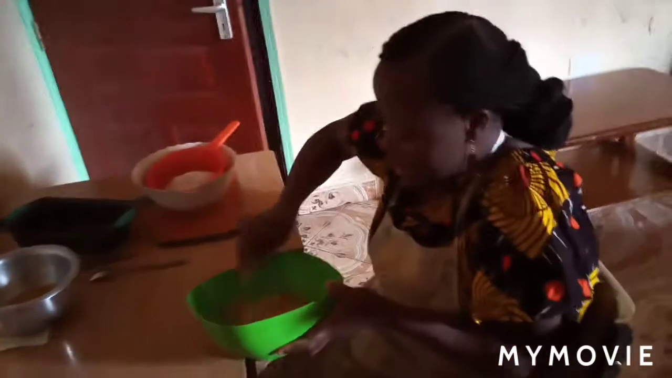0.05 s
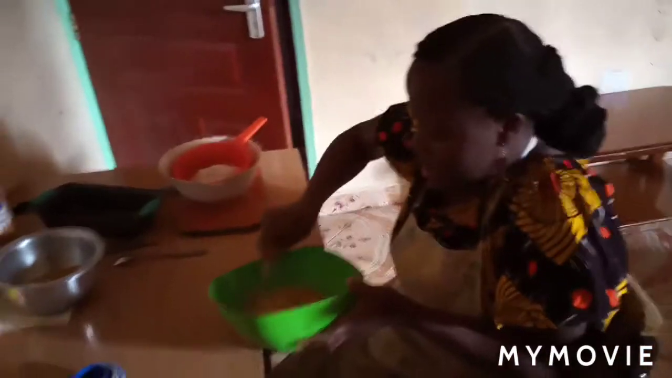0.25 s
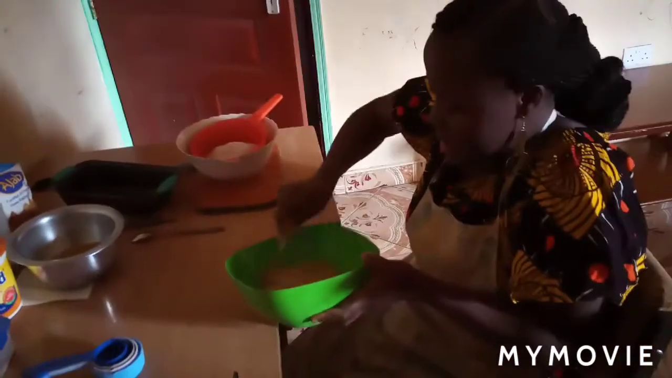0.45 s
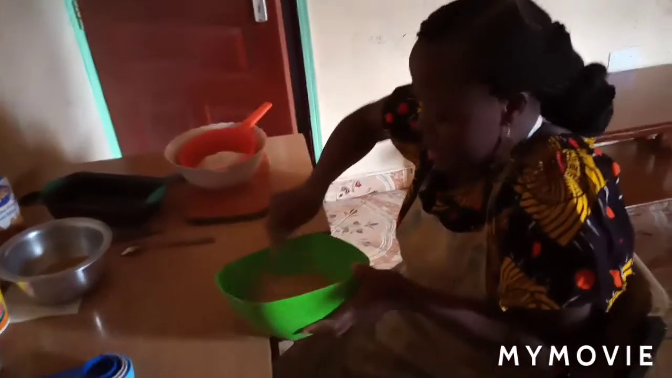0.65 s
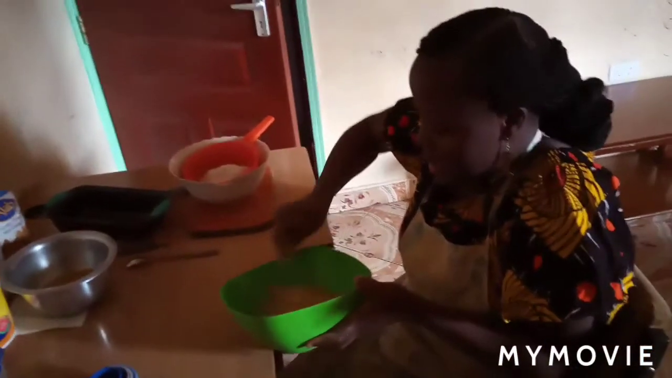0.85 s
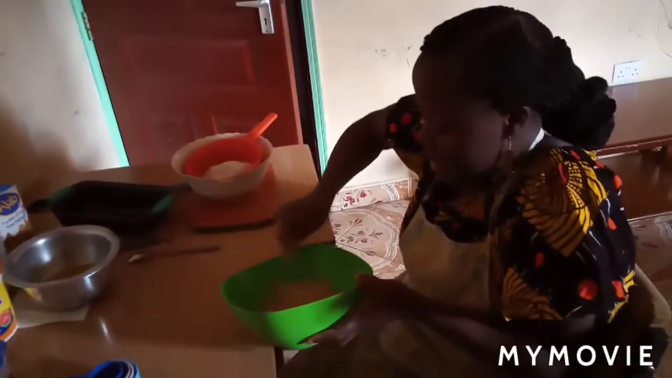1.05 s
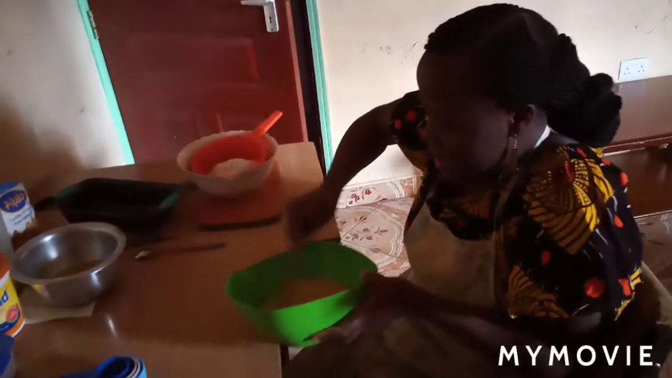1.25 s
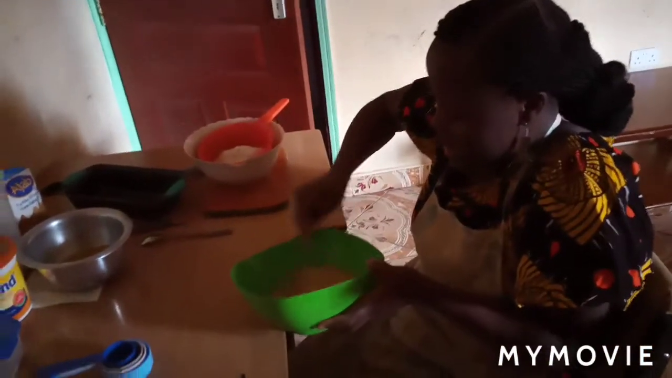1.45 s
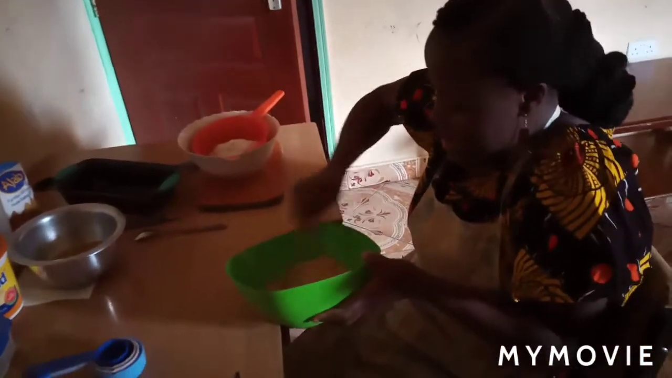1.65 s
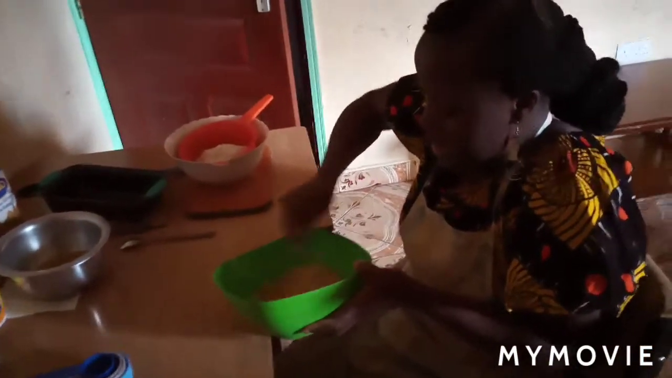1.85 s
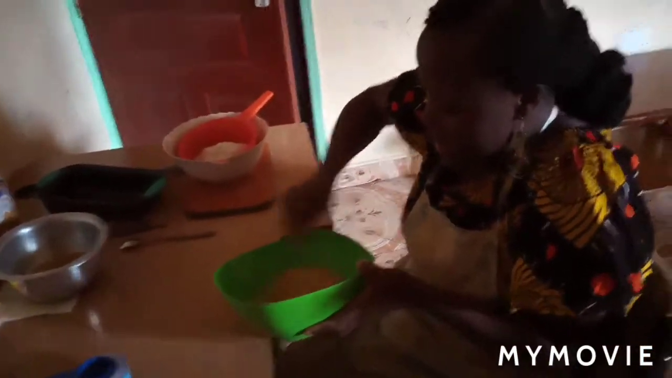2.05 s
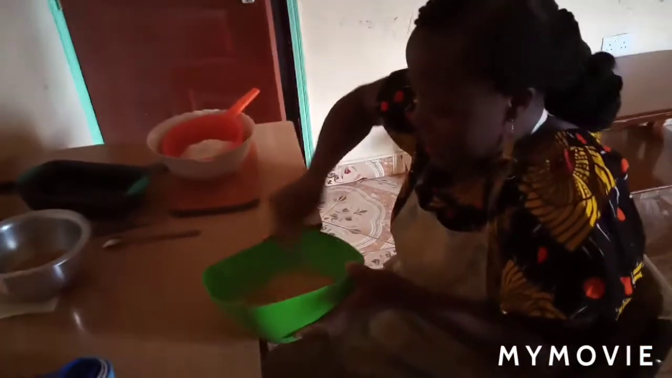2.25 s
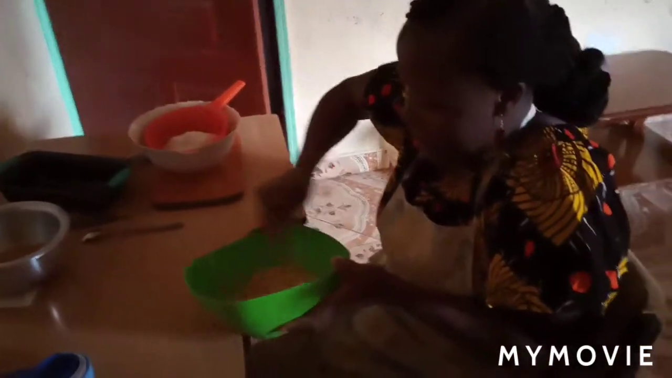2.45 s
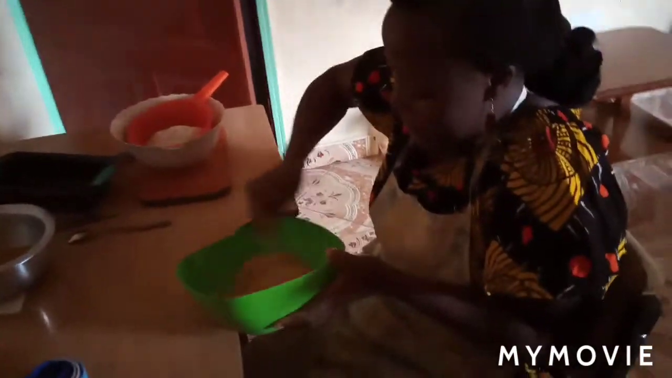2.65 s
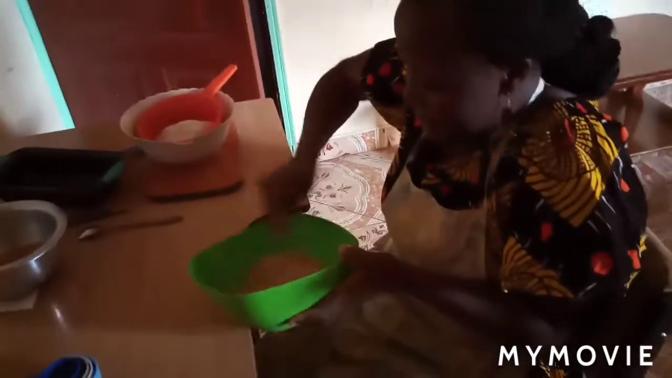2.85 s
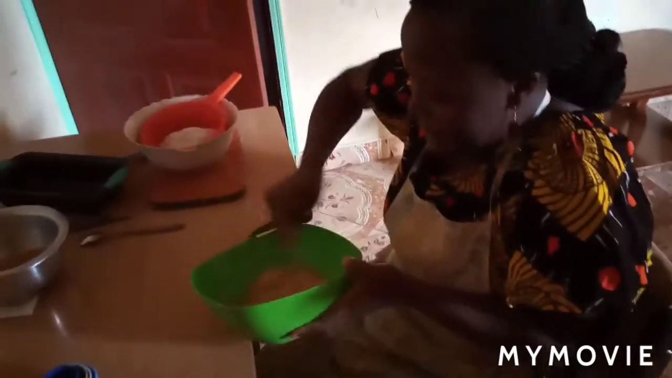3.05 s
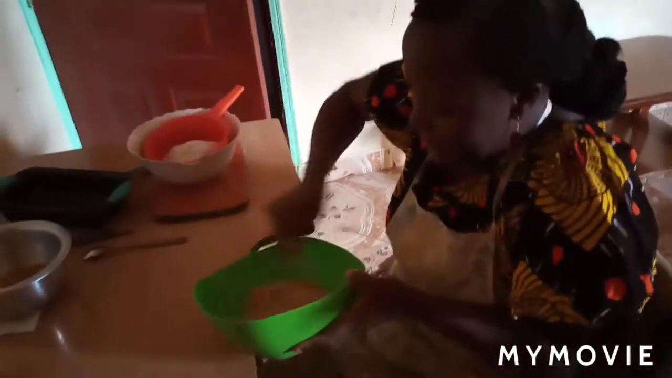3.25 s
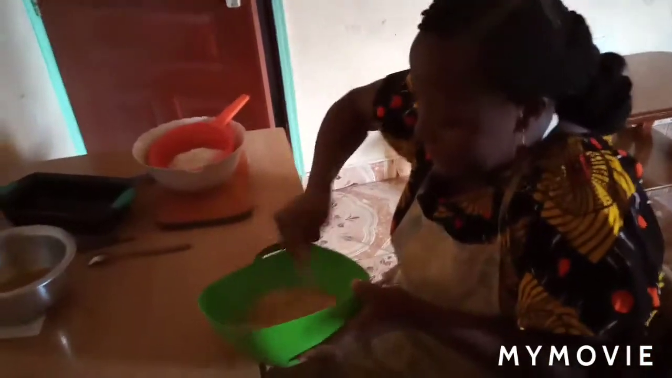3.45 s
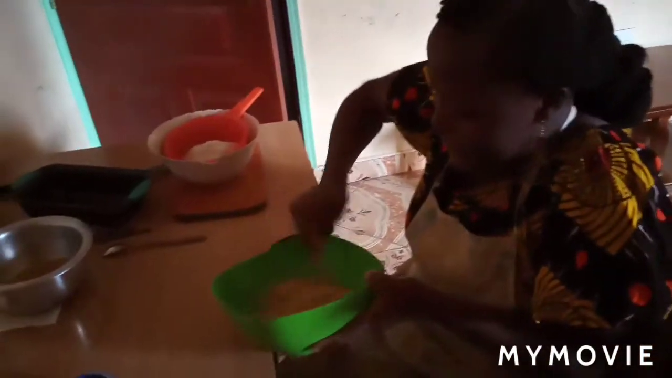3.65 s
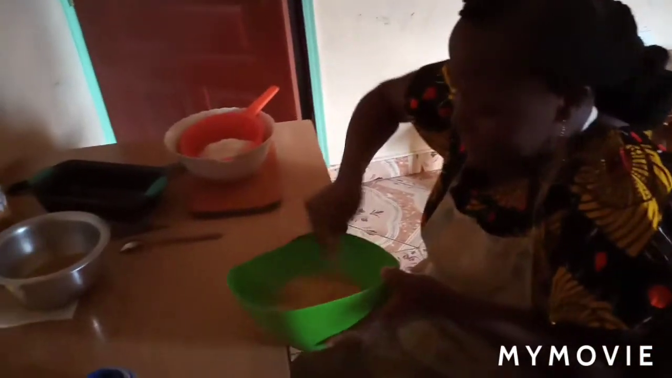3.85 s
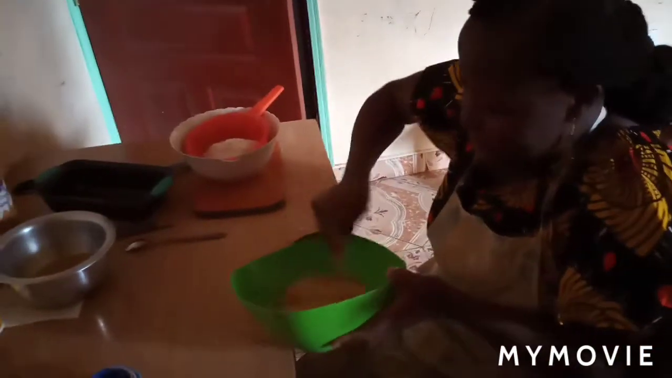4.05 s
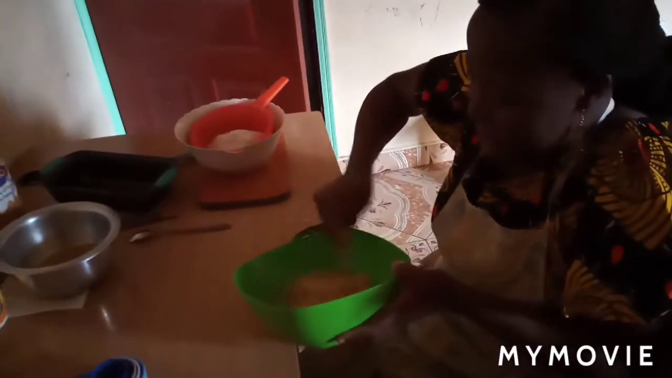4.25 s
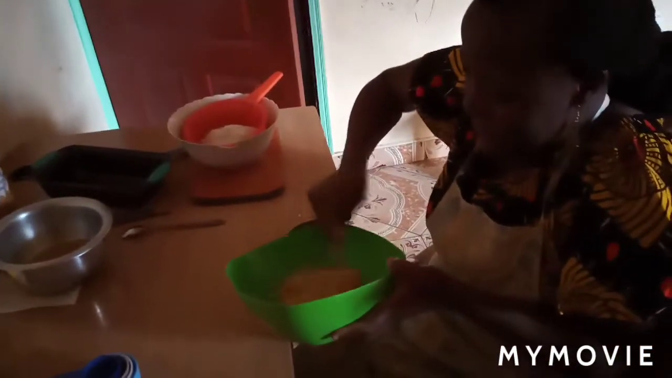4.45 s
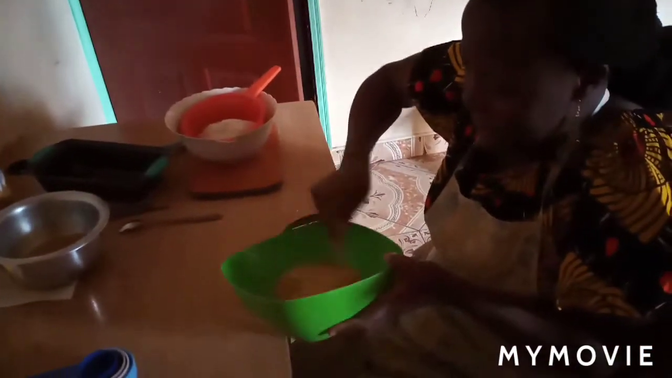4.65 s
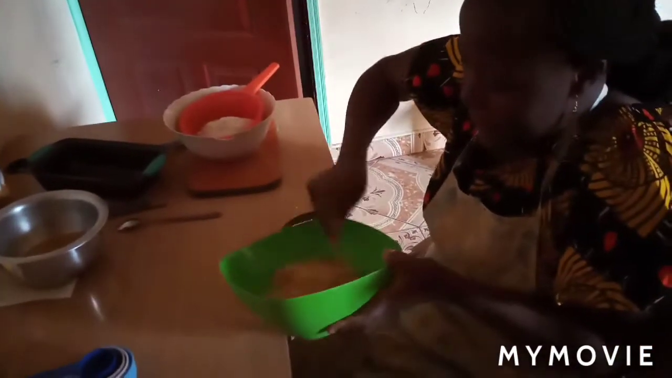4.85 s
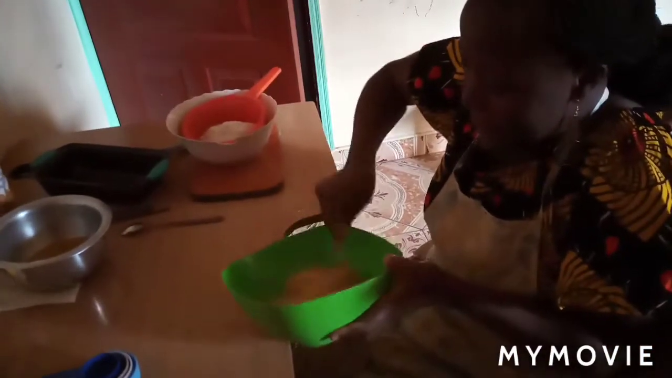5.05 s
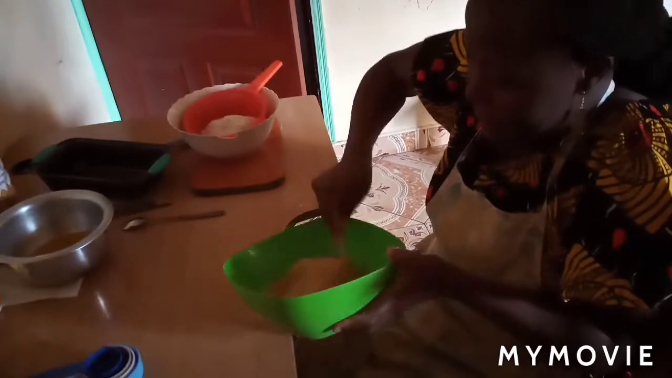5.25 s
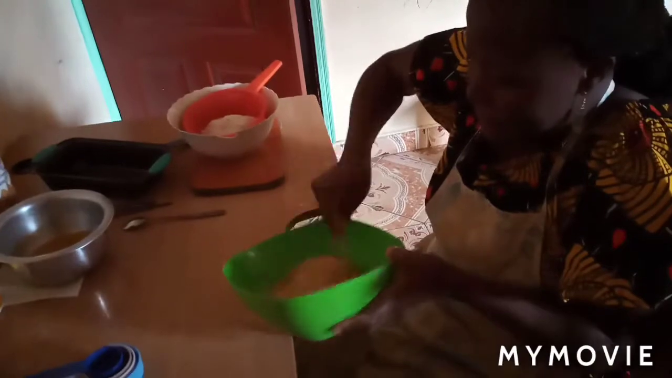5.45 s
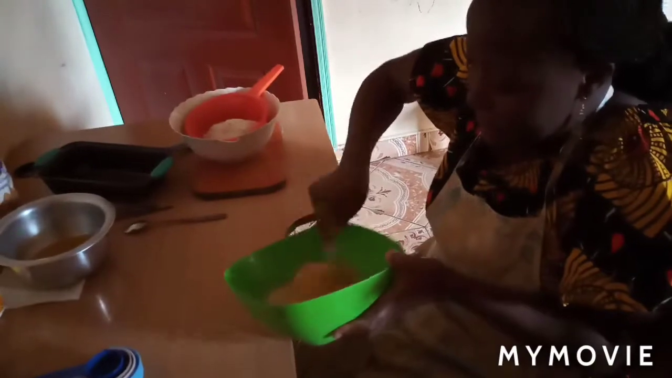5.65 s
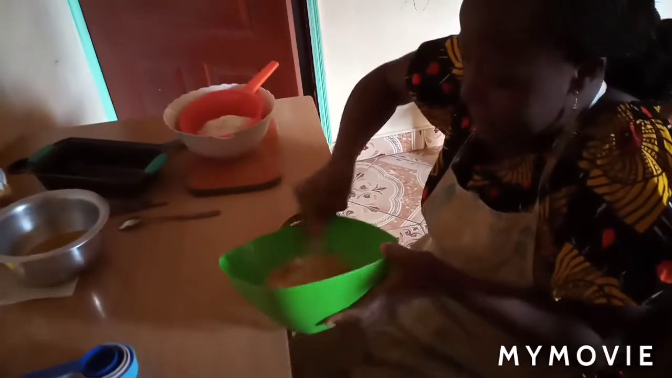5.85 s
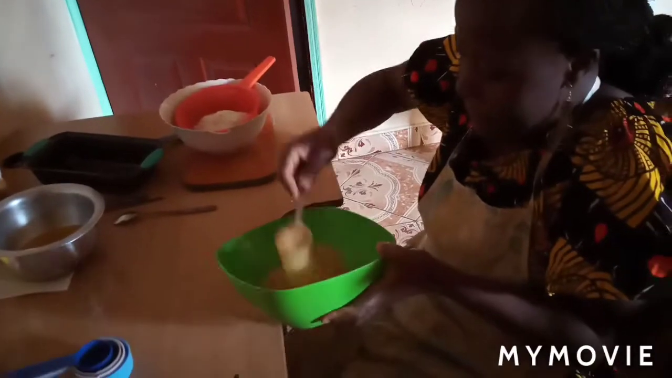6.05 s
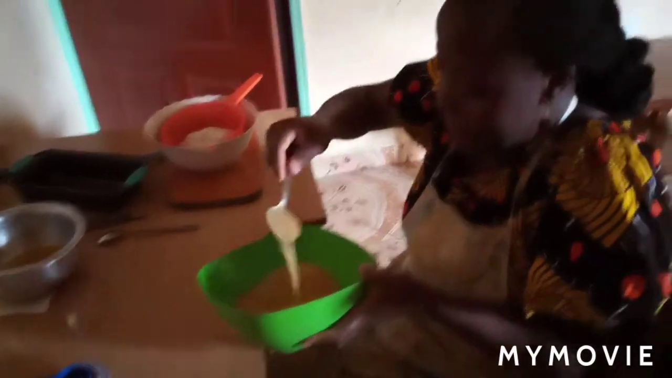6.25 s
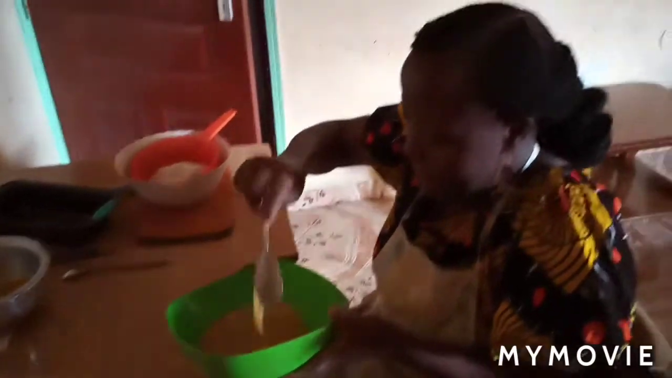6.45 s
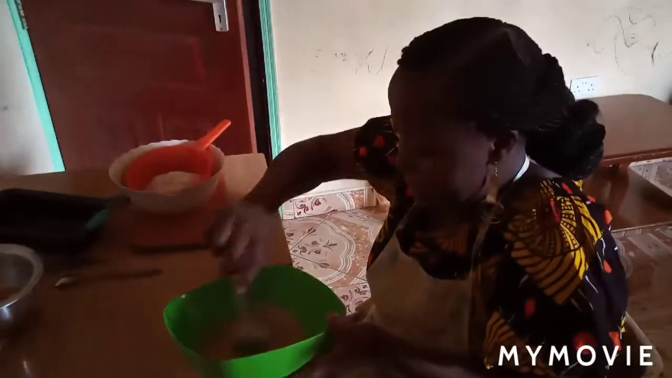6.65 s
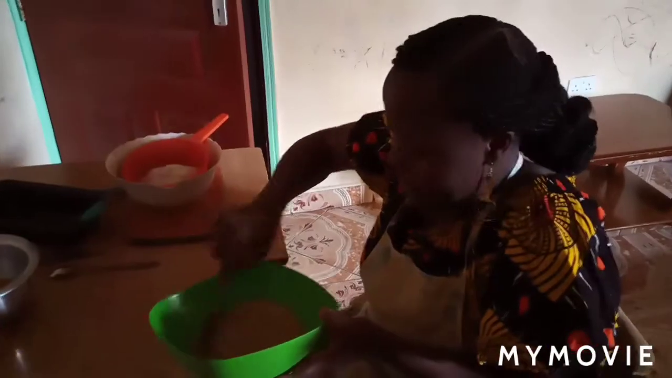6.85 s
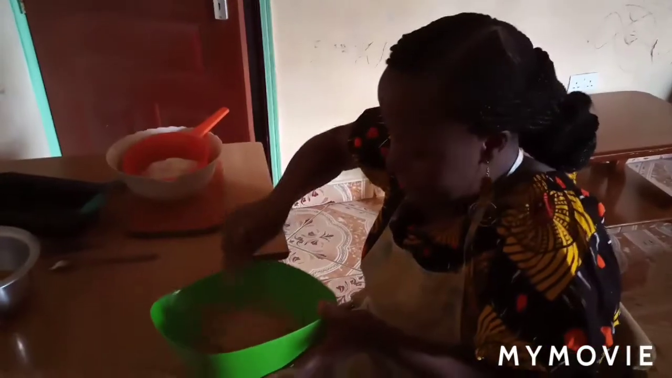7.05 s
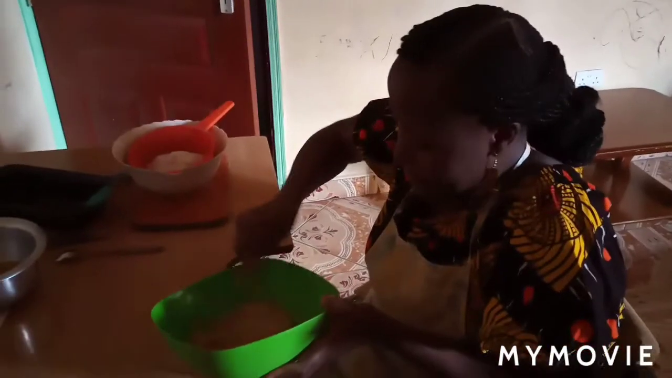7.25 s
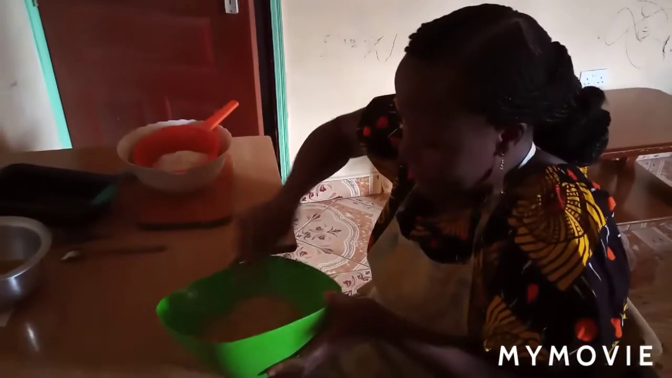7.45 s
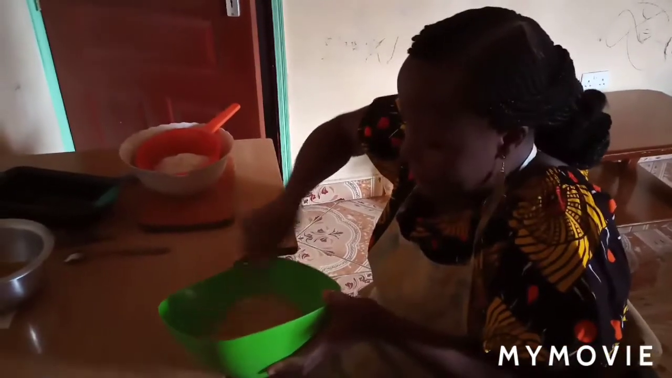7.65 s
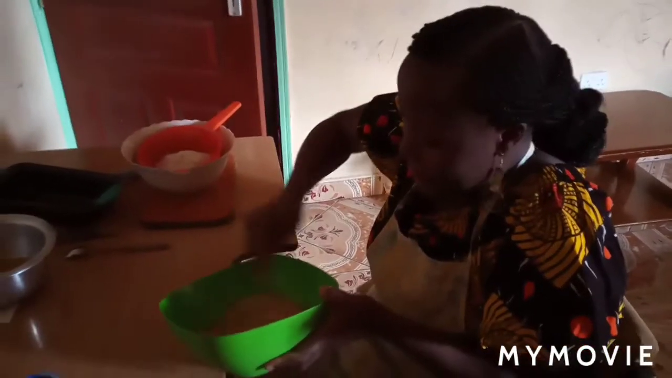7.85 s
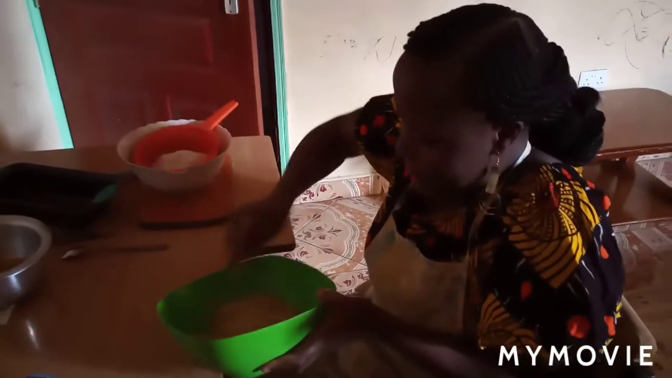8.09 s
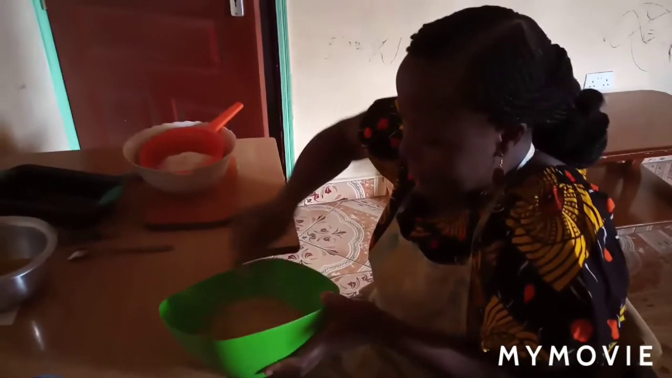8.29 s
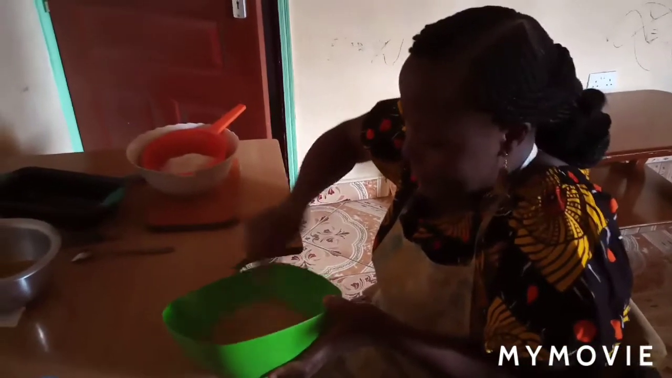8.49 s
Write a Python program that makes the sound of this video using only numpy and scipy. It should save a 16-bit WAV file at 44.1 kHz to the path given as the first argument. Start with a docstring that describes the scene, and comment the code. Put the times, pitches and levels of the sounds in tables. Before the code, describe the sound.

A spoon briskly beats wet egg and sugar batter in a plastic bowl, clacking five times a second, pausing briefly, then resuming in a small kitchen.

```python
"""A spoon beats eggs and sugar in a hand-held plastic bowl, five strokes a second, in a small bare kitchen.
In each turn it dips with a wet swish, clacks on the wall, drags along it and often flings batter back with a slap.
Midway through the first bout a few dull bumps come through the table; now and then an air pocket gulps.
After six seconds the spoon is lifted to drip and set back with a click, then a shorter bout follows.
Contacts are shaped noise, the bowl, table and bubbles are damped sines, and the walls answer with decaying noise."""
import sys
import numpy as np
from scipy import signal
from scipy.fft import rfft, irfft, next_fast_len
from scipy.io import wavfile

SR = 44100
rng = np.random.default_rng(int(sys.argv[2]) if len(sys.argv) > 2 else 0)


def master(y):
    """Save y as 16-bit WAV."""
    cut = np.clip(np.atleast_2d(y).T, -1, 1)
    pcm = np.round(cut * 32767)  # scale
    wavfile.write(sys.argv[1], SR, pcm.astype(np.int16))


N = 375858  # samples, about 8.5 s
T = np.arange(SR // 2) / SR  # time since a contact [s]

# turns of the spoon: (time it hits the wall [s], relative clack level [dB],
# then re the clack: bowl ring [dB], swish before [dB], slap after [dB])
STROKES = [(0.0014, -22.0, -10.0, -8.0, 4.0), (0.1974, -19.5, -5.0, -10.0, -12.0),
           (0.4045, -20.5, -6.0, -7.0, -1.0), (0.61, -19.5, -5.0, -8.0, -2.0),
           (0.82, -17.0, -6.0, -8.0, -7.0), (1.0266, -17.5, -5.0, -4.0, -10.0),
           (1.2311, -17.5, -10.0, -8.0, -9.0), (1.4321, -19.5, -7.0, -7.0, -4.0),
           (1.6362, -16.5, -15.0, -3.0, -13.0), (1.8334, -14.0, -12.0, -9.0, -14.0),
           (2.0408, -17.0, -7.0, -3.0, 3.0), (2.2418, -17.0, -4.0, -7.0, -2.0),
           (2.4428, -15.5, -8.0, -2.0, -7.0), (2.6452, -16.0, -9.0, -16.0, -3.0),
           (2.8474, -19.0, -0.0, -7.0, -2.0), (3.0513, -17.0, -6.0, -5.0, -7.0),
           (3.2535, -19.0, -9.0, -13.0, -3.0), (3.4615, -17.5, -4.0, 2.0, -2.0),
           (3.6681, -17.0, -6.0, -9.0, -9.0), (3.8712, -17.5, -2.0, -2.0, -10.0),
           (4.0716, -18.0, -6.0, -12.0, -5.0), (4.2722, -19.5, -7.0, -1.0, -17.0),
           (4.4757, -16.5, -8.0, -3.0, -2.0), (4.6813, -17.0, -7.0, -16.0, -5.0),
           (4.886, -15.0, -13.0, -15.0, -18.0), (5.0814, -16.0, -5.0, -4.0, -18.0),
           (5.2979, -17.0, -7.0, -10.0, -18.0), (5.4979, -15.5, -11.0, -8.0, -12.0),
           (5.7094, -16.5, -5.0, -7.0, -18.0), (5.9264, -19.5, -11.0, -1.0, -18.0),
           (7.2564, -24.0, -11.0, -10.0, -18.0), (7.455, -19.5, -9.0, -11.0, -18.0),
           (7.6575, -20.0, -11.0, -8.0, -18.0), (7.8568, -18.0, -12.0, -14.0, -4.0),
           (8.0586, -17.0, -4.0, -2.0, -6.0), (8.2708, -16.0, -5.0, -7.0, -18.0),
           (8.48, -16.5, -9.0, -8.0, -18.0)]
# colour of the spoon or flung lumps moving through batter: (frequency [Hz], relative level [dB per Hz])
BATTER_COLOUR = [(180, -41.5), (300, 2.5), (486, 3.5), (1190, 4.5), (1560, -8.5), (1810, -1), (3240, 2),
                 (4020, -7), (4670, -29.5), (6100, -13.5), (7200, -28.5), (10400, -26), (16000, -56)]


def strokes():
    """The spoon strikes and rebounds on the wall, sets the bowl ringing, then drags through the sugar."""
    # colour of spoon on bowl wall: (frequency [Hz], relative level [dB per Hz])
    clack_colour = [(65, -69), (110, -25.5), (238, -14.5), (454, 0), (941, -7.5), (1070, -10.5), (1230, -6),
                    (1650, -10), (3280, -10), (3880, -8), (5090, -20.5), (5760, -16.5), (6670, -25),
                    (10500, -29), (16000, -61.5)]
    # modes of the loaded bowl: (multiple of the ring pitch, level [dB], t60 [s])
    bowl_modes = [(.76, -23, 0.048), (0.999, 1.5, 0.079), (1.2, -9, 0.083), (1.42, -16.5, 0.023)]
    # standing waves of the kitchen: (frequency [Hz], level [dB], t60 [s])
    standing_waves = [(72.3, -41, 1), (141.7, -15, 0.2), (222.2, -24.5, 0.37), (432.4, -14, 0.26),
                      (687, -20, 0.61), (836, -29.5, 0.92)]
    # the hollow behind the spoon colours each clack: lift, middle note, range either way
    hollow_lift_db, hollow_middle_hz, hollow_octaves = 2, 1020, .35
    # note of the freely ringing bowl; share by which the shifting batter detunes it
    free_ring_hz, ring_scatter = 476, .018
    sag_hz_per_db = 2.6  # batter on the wall makes the ring both weaker and lower
    out = np.zeros(N)
    for s, db, ring_db, _, _ in STROKES:
        hollow_hz = hollow_middle_hz * 2 ** (hollow_octaves * rng.uniform(-1, 1))
        sagged_hz = free_ring_hz + sag_hz_per_db * ring_db
        ring_hz = sagged_hz * (1 + ring_scatter * rng.standard_normal())

        touch = burst(rise=.0002, length=.005) + 1.1 * fade(.005)
        rebound = 0.59 * burst(rise=0.00032, length=0.0056) + 0.89 * fade(0.0033)
        add(touch, .005 + rng.uniform(-.0012, 0.0011), rebound)
        clack = amp(db + 18.4) * contact(touch, clack_colour, spread_db=2.5, wet_db=-1.0,
                                         hollow_db=hollow_lift_db, hollow_hz=hollow_hz)

        drag_swell = np.exp(-((T - .036) / 0.029) ** 2)
        drag = amp(db + 8.3) * contact(drag_swell, BATTER_COLOUR, spread_db=8.5, wet_db=-5.5, hollow_db=-4.5)

        # the batter chokes the ring as the spoon moves on
        choke = burst(rise=0.0023, length=0.026)
        ring = amp(db + ring_db + 6.7) * modes(bowl_modes, pitch=ring_hz, vary_db=1.2) * choke
        add(out, s, clack + drag + in_kitchen(ring, wet_db=-8.5))

        # the room's standing waves build up a moment later
        boom = amp(db + .5 * ring_db - 1) * modes(standing_waves) * swell(0.015)
        add(out, s + 0.00376 + rng.uniform(0, 0.0033), boom)
    return out


def dips():
    """Before each clack a wet swish swells as the spoon cuts into the batter and pushes air under."""
    # colour of the spoon cutting in: (frequency [Hz], relative level [dB per Hz])
    swish_colour = [(240, -33.5), (400, 0), (921, -7.5), (1250, -1.5), (2180, -7), (2750, -11), (4050, -3),
                    (4650, -15), (6950, -22), (8760, -19.5), (11200, -30), (16000, -42)]
    usual_db = -18  # clack of an ordinary stroke
    lead_s, jitter_s = .021, .001  # usual time from entering the batter to the wall, and its scatter
    lead_s_per_db = .0015  # a softer, slower stroke takes longer to get there
    skim_s, skim_share = .016, .15  # the spoon skims the surface before it cuts in: how long, how strongly
    gulp_db, gulp_hz = -16, 1120  # air pushed under: level re the clack, middle note
    out = np.zeros(N)
    for s, db, _, swish_db, _ in STROKES[1:]:  # the first stroke is already at the wall
        enters = s - lead_s + lead_s_per_db * (db - usual_db) + jitter_s * rng.standard_normal()
        cut = skim_share * burst(rise=0.0037, length=skim_s)
        add(cut, skim_s, burst(rise=0.0037, length=0.019))
        swish = amp(db + swish_db + 14) * contact(cut, swish_colour, spread_db=4.0, wet_db=-1.5, hollow_db=-5.5)
        gulp = pocket(db + gulp_db + 18, gulp_hz, within=0.0079, scatter=0.323, life=0.032)
        add(out, enters - skim_s - .008, swish)
        add(out, enters - .002, in_kitchen(gulp, wet_db=-3.5))
    return out


def slaps():
    """After a short flight the batter flung by each stroke spatters back and traps air."""
    # flung batter flies longest in the middle of the first bout: (time [s], time from clack to slap [s])
    flight = [(0, .059), (2.1, .061), (3.25, .072), (4.5, .062), (8.1, .055)]
    plop_db, plop_hz = -6, 900  # air trapped as the batter lands: level re the slap, middle note
    out = np.zeros(N)
    for s, clack_db, _, _, slap_db in STROKES:
        lands = s + np.interp(s, *np.transpose(flight))
        db = clack_db + slap_db
        landing = np.exp(-((T - .009) / 0.0079) ** 2)
        spatter = amp(db + 18.3) * contact(landing, BATTER_COLOUR, spread_db=3, wet_db=-4, hollow_db=0.5)
        plop = pocket(db + plop_db + 15.5, plop_hz, within=0.00726, scatter=0.387, life=0.025)
        add(out, lands - .005, spatter)
        add(out, lands - .001, in_kitchen(plop, wet_db=-6))
    return out


def big_gulps(count=2):
    """A large pocket of air breaks into a pair of bubbles of nearly one note."""
    # air pockets that stand out as they close: (time [s], relative level [dB], starting note [Hz])
    large_pockets = [(.179, -26, 1250), (.884, -22, 900), (1.093, -21, 920), (1.295, -24, 920),
                     (1.488, -19, 915), (2.306, -19, 620), (2.907, -20, 840), (4.178, -28, 800),
                     (4.253, -13.5, 800), (4.536, -23, 1220), (5.066, -23, 1200), (5.198, -30, 1160),
                     (7.257, -19.5, 780), (8.112, -19, 860), (8.246, -23, 816)]
    out = np.zeros(N)
    for s, db, hz in large_pockets:
        # a large pocket rings longer than a small one
        gulp = amp(db + 16) * bubbles(hz, within=0.006, scatter=0.25, life=.036, count=count)
        add(out, s - .001, in_kitchen(gulp, wet_db=-5))
    return out


def droplets(count=6):
    """After each stroke a few small bubbles and flecks of batter burst with tiny ticks."""
    out = np.zeros(N)
    for s, db, *_ in STROKES:
        ticks = np.zeros(len(T))
        for when, note, size in rng.uniform(size=(count, 3)):
            hz = 1200 * 6 ** note
            # a smaller bubble sounds higher and dies sooner
            tick = np.sin(2 * np.pi * hz * T) * swell(2 / hz) ** 2 * fade(12 / hz)
            tick_db = db - 0.5 + 8.5 * size ** 2 - 15.5 * when - 10 * note
            add(ticks, .015 + 0.16 * when, amp(tick_db) * norm(tick))
        add(out, s, in_kitchen(ticks, wet_db=-9))
    return out


def taps():
    """The spoon's edge clicks lightly on the plastic, with a faint bowl note near 480 Hz."""
    # light, dry taps as the spoon is set back: (time [s], relative level [dB])
    set_back = [(6.7642, -52.5), (6.8462, -22), (6.932, -38), (7.014, -42)]
    # colour of a tap: (frequency [Hz], relative level [dB per Hz])
    tap_colour = [(150, -45), (250, -20.5), (484, -5), (607, -25), (788, -18), (875, -19.5), (1280, -7),
                  (1790, -14.5), (3580, -14), (7190, -24), (8550, -33), (10900, -30), (16000, -61)]
    out = np.zeros(N)
    for s, db in set_back:
        click = contact(fade(.07), tap_colour, spread_db=2.5, wet_db=-2.5)
        add(out, s - .0005, amp(db + 18.5) * click)
    return out


def bumps():
    """Soft, heavy contacts that move only the table's low modes."""
    # dull bumps on the table: (time [s], relative level [dB], pitch [multiple of the table's modes])
    table_bumps = [(3.143, -23.5, 1), (3.343, -25, 1), (3.415, -31, 1.35), (3.539, -21.5, 1)]
    # modes of the table: (frequency [Hz], level [dB], t60 [s])
    table_modes = [(72.7, -24, 0.6), (140, -3.5, 0.1), (177, -1.5, 0.091), (248, 7.5, 0.032),
                   (234.6, -12, 0.33)]
    out = np.zeros(N)
    for s, db, pitch in table_bumps:
        thud = amp(db) * modes(table_modes, pitch=pitch, vary_db=0.5) * swell(0.006)
        add(out, s, in_kitchen(thud, wet_db=-9.5))
    return out


def still_air():
    """The faint steady rush of the house, as coloured noise."""
    # colour of the quiet house: (frequency [Hz], relative level [dB])
    quiet_colour = [(15, -44), (25, -12), (64, 2), (242, 0), (451, -6), (503, 6), (545, -9), (677, -3.5),
                    (911, -11), (3720, -12.5), (4610, -24), (5880, -22), (7110, -29), (8140, -29),
                    (16000, -35)]
    rush_db = -64.5  # RMS re full scale
    hz = np.fft.rfftfreq(N, 1 / SR)
    rush = irfft(rfft(rng.standard_normal(N)) * amp(along(quiet_colour, hz)), N)
    return amp(rush_db) * rush / np.std(rush)


def contact(envelope, spectrum, spread_db, wet_db, hollow_db=0, hollow_hz=1000):
    """Grainy contact noise: the bowl's near side is heard directly, both sides by way of the walls."""
    forces = [norm(grains(spread_db) * envelope) for side in range(2)]
    near, far = coloured(forces, spectrum, hollow_db, hollow_hz)
    return near + amp(wet_db) * (walls(near) + walls(far)) / np.sqrt(2)


def grains(spread_db):
    """Dense tiny contacts of very unequal size."""
    sizes = np.repeat(rng.standard_normal(len(T)), SR // 2000)[:len(T)]  # about 2000 new sizes a second
    return rng.standard_normal(len(T)) * amp(spread_db * np.minimum(sizes, 2))


def coloured(force, spectrum, hollow_db, hollow_hz):
    """A force through a causal body filter, lifted or dulled near the note of the hollow in the batter."""
    hz = np.fft.rfftfreq(len(T), 1 / SR)
    hollow = np.exp(-(2 * np.log2((hz + 1) / hollow_hz)) ** 2)
    gain = amp(along(spectrum, hz))
    gain = gain / np.sqrt(np.mean(gain ** 2)) * amp(hollow_db * hollow)
    # folding the cepstrum forward in time gives minimum phase
    cepstrum = irfft(np.log(gain + 1e-6), len(T))
    cepstrum[1:len(T) // 2] *= 2
    cepstrum[len(T) // 2:] = 0
    return irfft(rfft(force) * np.exp(rfft(cepstrum)), len(T))


def pocket(db, hz, within, scatter, life):
    """Bubbles from an air pocket of chance size and level: a larger one sounds lower."""
    scatter_db, scatter_octaves = 1.5, .25  # no two air pockets are alike
    level, size = rng.standard_normal(2)
    note_hz = hz * 2 ** (-scatter_octaves * size)
    return amp(db + scatter_db * level) * bubbles(note_hz, within, scatter, life)


def bubbles(hz, within, scatter, life, count=4):
    """A pocket of air breaks into a few bubbles, each rising in pitch as it closes."""
    out = np.zeros(len(T))
    for k, (when, detune) in enumerate(rng.uniform(size=(count, 2))):
        pitch = hz * np.exp(scatter * k * (detune - .5))
        rising = np.sin(2 * np.pi * pitch * T * (1 + 2 * T))
        add(out, when * within, rising * swell(0.00033) * fade(life) / (1 + k / 2))
    return norm(np.diff(out, prepend=0))  # only the change of flow radiates


def modes(table, pitch=1, vary_db=2):
    """Damped sines at new strengths for each blow."""
    out = np.zeros(len(T))
    for hz, db, t60 in table:
        strength = amp(db + rng.normal(0, vary_db))
        out += strength * np.sin(2 * np.pi * pitch * hz * T) * fade(t60)
    return out


def in_kitchen(sound, wet_db):
    """The direct sound and its reverberation."""
    return sound + amp(wet_db) * walls(sound)


def walls(sound, build=0.0026):
    """The kitchen's answer: decaying noise, with a new random tail for each sound."""
    # reverberation of the kitchen: (frequency [Hz], t60 [s])
    kitchen_decay = [(150, 1), (400, 0.38), (750, 0.44), (2000, 0.36), (4500, 0.35), (12000, 0.33)]
    hz, t, z = signal.stft(rng.standard_normal(len(T)), SR, nperseg=256)
    decay = np.exp(-np.log(1000) * t / along(kitchen_decay, hz)[:, None])
    tail = signal.istft(z * decay, SR, nperseg=256)[1][:len(T)]
    return signal.fftconvolve(sound, norm(tail * swell(build) ** 2))[:len(T)]


def burst(rise, length):
    """Envelope of a contact that builds, holds and lets go."""
    return swell(rise) ** 2 / (1 + (T / length) ** 4)


def swell(rise):
    """Soft start with time constant rise [s]."""
    return 1 - np.exp(-T / rise)


def fade(t60):
    """Exponential decay by 60 dB in t60 seconds."""
    return np.exp(-np.log(1000) * T / t60)


def amp(db):
    """Decibels to gain."""
    return 10 ** (np.asarray(db) / 20)


def norm(x):
    """x with energy 1."""
    return x / np.sqrt(np.sum(x ** 2) + 1e-20)


def along(points, hz):
    """(Hz, value) points read on a log axis."""
    f, v = np.transpose(points)
    return np.interp(np.log(hz + 1), np.log(f + 1), v)


def add(track, s, sound):
    """Mix a sound into the track at s seconds."""
    part = track[max(round(s * SR), 0):][:len(sound)]
    part += sound[:len(part)]


def scene():
    """Everything at one microphone, an arm's length from the bowl."""
    beating = strokes() + dips() + slaps() + big_gulps() + droplets()
    return (beating + taps() + bumps() + still_air())[None]


def record(dry):
    """The phone keeps nothing above its band limit."""
    top_hz = 15950
    size = next_fast_len(N + SR // 2)
    kept = np.fft.rfftfreq(size, 1 / SR) < top_hz
    return irfft(rfft(dry, size) * kept, size)[..., :N]


dry = scene()
out = record(dry)
master(out)
```